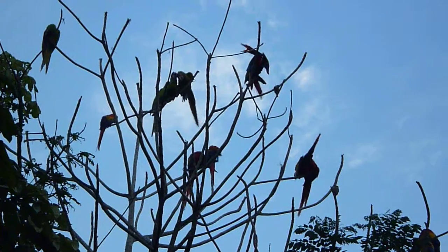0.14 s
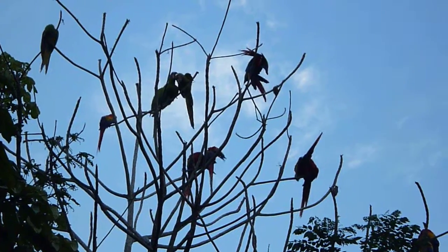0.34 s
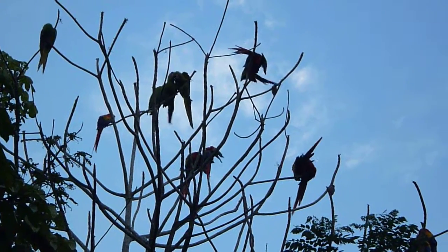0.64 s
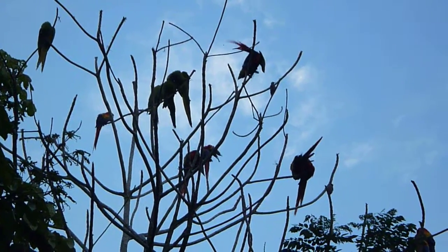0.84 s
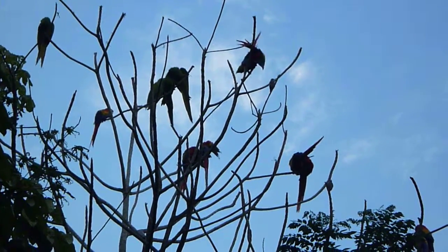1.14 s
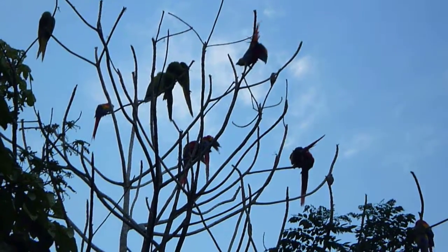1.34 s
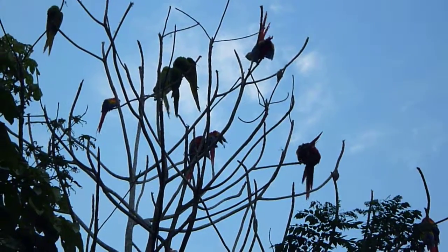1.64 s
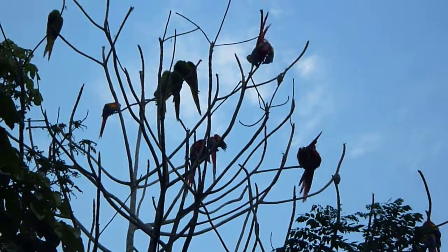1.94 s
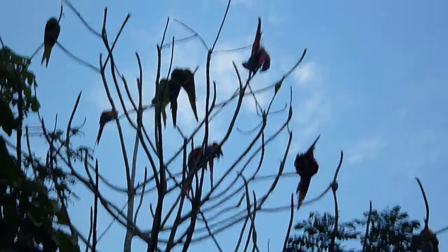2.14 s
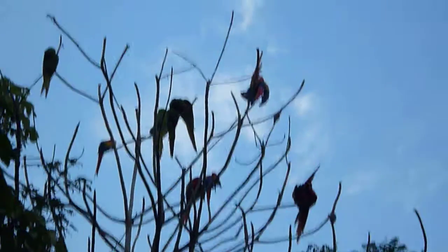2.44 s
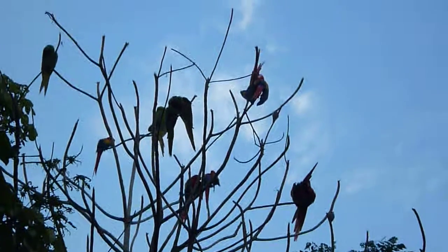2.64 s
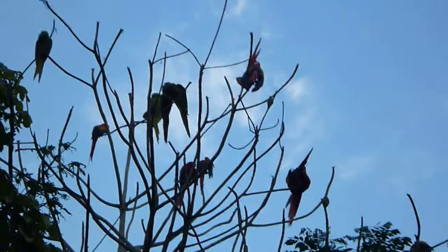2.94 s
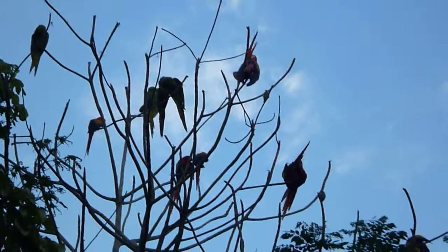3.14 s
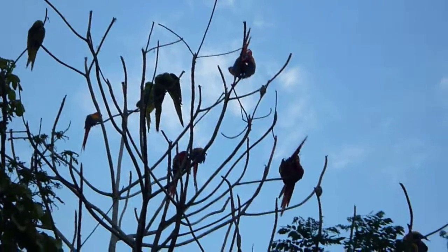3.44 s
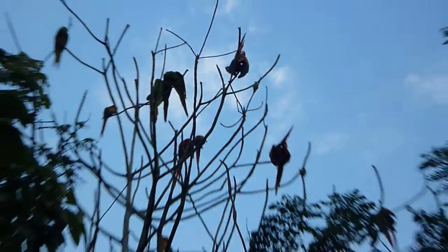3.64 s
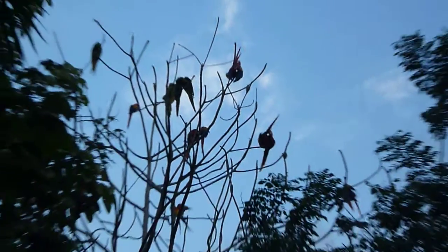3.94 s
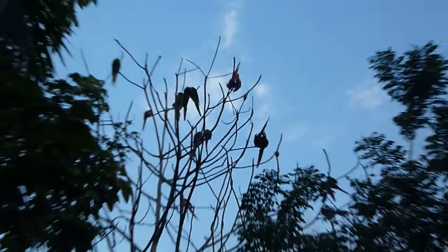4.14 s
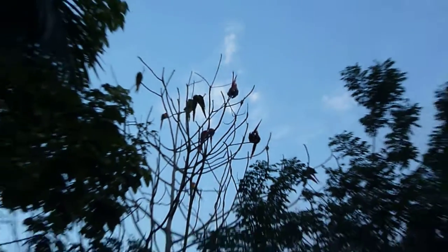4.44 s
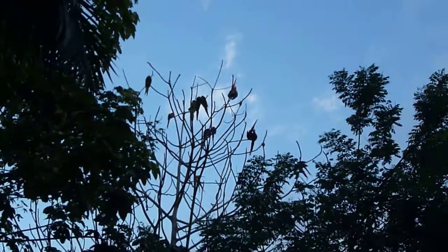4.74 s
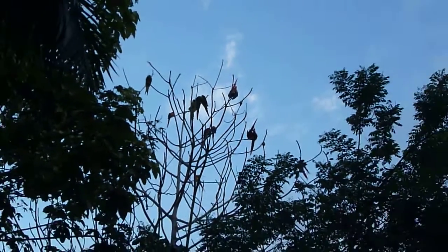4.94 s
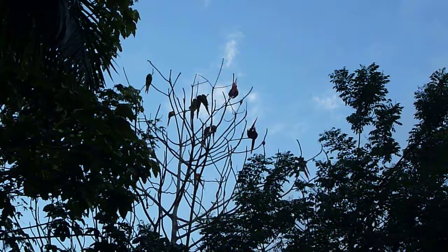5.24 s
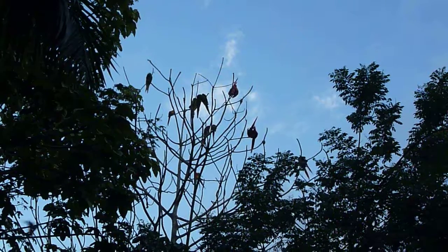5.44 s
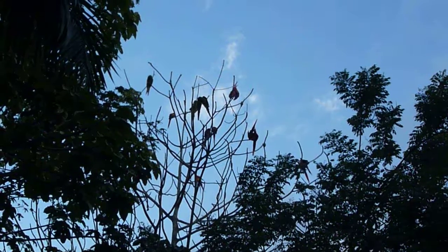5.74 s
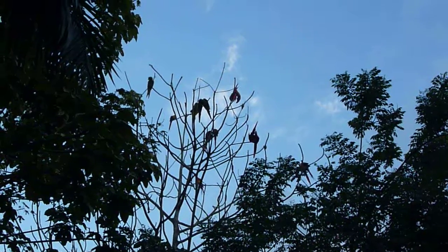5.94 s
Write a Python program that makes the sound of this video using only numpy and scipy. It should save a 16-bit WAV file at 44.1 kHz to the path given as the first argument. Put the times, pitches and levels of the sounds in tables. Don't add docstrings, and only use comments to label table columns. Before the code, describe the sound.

A six-second outdoor scene under trees, with mildly dull, hissy small-camera sound. A hoarse parrot squawk swells up at about 0.2 s, a stronger one follows at 0.75, and further raspy, wavering calls come until 2.9, overlapping most around 2.0-2.5. Two low peeps sit near 0.6, and one clear small-bird whistle arches and drops at 1.6-1.8. Close plastic ticks sound at 1.23 and 1.9, with a bump at 1.95. From 3 to 4 s the flock quiets; long faint whistles and small grating calls remain. A squawk returns at 4.0, a scuff and bump at 4.65, then rough squawks at 5.1, 5.3 and 5.65. A loud, dense clatter of clicks strikes at 5.68-5.8, before a last faint squawk and chirps. Soft forest air and a thin, throbbing insect ring persist throughout, with intermittent very faint low engine drones.

```python
import sys
import numpy as np
from scipy import signal
from scipy.fft import rfft, irfft
from scipy.io import wavfile

SR = 44100
rng = np.random.default_rng(int(sys.argv[2]) if len(sys.argv) > 2 else 0)


def volts(x):
    e = np.asarray(x, float) / 20
    return 10 ** e


def waveform_to_disk(signal):
    frames = np.transpose(np.atleast_2d(signal))
    scaled = np.clip(frames, -1, 1) * 32767
    samples = np.round(scaled).astype(np.int16)
    wavfile.write(sys.argv[1], SR, samples)


N = 268128

# start in seconds, attack in seconds, hold in seconds,
# release in seconds, level in dB.
SQUAWK_CALLS = [(.21, .2, .04, .2, -42.5), (.75, 0.29, 0.0033, 0.13, -38.5), (1.075, 0.063, 0.091, .1, -46),
                (1.499, .12, 0.067, 0.038, -49.5), (1.937, 0.013, 0.012, 0.15, -44),
                (2.065, 0.063, .22, .07, -40), (2.357, 0.02, .17, 0.13, -43.5), (2.7, 0.12, .03, 0.22, -53),
                (4.031, 0.15, 0.0091, 0.19, -47), (5.062, 0.13, 0.071, .2, -42.5),
                (5.32, .24, .07, 0.11, -38), (5.94, 0.14, 0.046, 0.046, -57.5),
                (2.059, 0.045, .15, 0.084, -45.5), (5.652, 0.019, 0.058, 0.19, -43.5),
                (4.72, 0.023, 0.029, .2, -53.5)]
# first pitch in Hz, last pitch in Hz,
# breath noise share from 0 to 1, throat shape number.
SQUAWK_VOICES = [(455, 470, .6, 0), (372, 335, .57, 1), (378, 340, .33, 2), (420, 420, .8, 3),
                 (498, 498, .4, 4), (472, 378, .36, 5), (565, 572, .6, 6), (450, 450, .8, 3),
                 (484, 470, .42, 7), (362, 352, .52, 8), (432, 425, .7, 9), (520, 536, .65, 4),
                 (502, 450, .3, 10), (435, 435, .7, 9), (450, 450, .8, 3)]
# frequency in Hz, density in dB per Hz.
THROAT_SHAPES = [
    [(900, -22), (1470, -1), (2100, -1), (2900, -2), (4470, -10)],
    [(900, -11.5), (1280, -7.5), (2190, -0.5), (2620, -6), (4400, -10)],
    [(1250, 5.5), (1480, -7.5), (1800, 4.5), (2300, -2.5), (4610, -8)],
    [(1000, -1), (1620, -2), (2400, -6.5), (3380, -6), (4600, -15.5)],
    [(1000, -19), (1470, 8.5), (2670, -3), (3340, -2.5), (4000, -6)],
    [(1190, -10), (1750, -7.5), (2380, 0.5), (2950, -6), (4200, -15.5)],
    [(1000, -15), (1680, -3.5), (1950, -7.5), (2990, -8), (4300, -16.5)],
    [(1090, -8), (1930, -1.5), (2910, -1), (3630, -14), (4370, -5.5)],
    [(1000, -7), (1470, -10.5), (1830, 1), (2050, -11), (2970, -8.5)],
    [(1000, -10), (1740, -1), (1950, -4), (2640, -4), (4270, -9)],
    [(1200, -14), (2300, -6), (2950, 5), (3500, -8), (4300, -7)],
]
# frequency in Hz, density in dB per Hz.
THROAT_SLOPES = [(530, -39.5), (5300, -21), (7000, -53.5)]


def squawks():
    sag_power = 4.0
    jitter_at_full_noise = 0.07
    beak_hz = 2500
    beak_lag, beak_steepness = 0.15, 0.96
    n = SR // 2
    out, t = np.zeros(N + n), np.arange(n) / SR
    for call, voice in zip(SQUAWK_CALLS, SQUAWK_VOICES):
        start_s, attack, hold, release, db = call
        first_hz, last_hz, noisy, throat = voice
        progress = np.minimum(t / (attack + hold + release), 1)
        pitch = first_hz + (last_hz - first_hz) * progress ** sag_power
        jitter = 1 + jitter_at_full_noise * noisy ** 2 * drift(95.3, n)
        phase = 2 * np.pi * np.cumsum(pitch * jitter) / SR

        tone = np.zeros(n)
        for k in range(2, 14):
            tone += volts(3.5 * drift(24, n)) * np.cos(k * phase + k * k * 0.3)
        breath = rng.standard_normal(n) * (1 + 0.47 * np.cos(phase))
        source = np.sqrt(1 - noisy) * rms_one(tone) + np.sqrt(noisy) * 1.9 * rms_one(breath)

        voiced, hz = colour(source, sorted(THROAT_SHAPES[throat] + THROAT_SLOPES))
        upper = 1 / (1 + (beak_hz / (hz + 1)) ** 8)
        parts = np.array([irfft(voiced * (1 - upper), n), irfft(voiced * upper, n)])
        chest, beak = rms_one(parts) / np.sqrt(2)

        stutter = rms_one(volts(2.0 * drift(130, n)))
        chest_gain = swell(t, attack, hold, release)
        beak_gain = swell(t - beak_lag * attack, attack, hold, release) ** beak_steepness
        start = round(start_s * SR)
        out[start:start + n] += stutter * volts(db) * (chest_gain * chest + beak_gain * beak)
    return out[:N]


def swell(t, attack, hold, release):
    depth_db, attack_curve, release_curve = 15.5, 1.58, 0.91
    before = np.clip(1 - t / attack, 0, 1)
    after = np.clip((t - attack - hold) / release, 0, 1)
    edge = np.clip(np.minimum(t, attack + hold + release - t) / 0.0087, 0, 1)
    return edge * volts(-depth_db * (before ** attack_curve + after ** release_curve))


# time in seconds, pitch in Hz, level in dB.
CLEAR_WHISTLE = [
    (1.562, 2020, -54),
    (1.58, 2050, -43),
    (1.635, 2100, -40),
    (1.685, 2060, -39),
    (1.72, 1960, -37),
    (1.742, 1790, -33),
    (1.758, 1610, -37),
    (1.778, 1440, -48),
]


def near_whistle():
    return whistles([CLEAR_WHISTLE], waver_hz=3.7, flutter_db=1.5)


# start in seconds, length in seconds, first pitch in Hz,
# last pitch in Hz, level in dB.
LONG_WHISTLES = [
    (1.24, .29, 2620, 3260, -60.5),
    (3.45, .36, 2860, 2840, -61),
    (3.58, .26, 2250, 2550, -65),
    (3.84, .3, 2850, 2850, -65),
    (4.1, .06, 1500, 1900, -54),
    (4.28, .3, 2860, 2830, -63),
    (5.03, .3, 2620, 3150, -57),
    (6.02, .05, 3400, 3600, -64),
]
# start in seconds, length in seconds, first pitch in Hz,
# last pitch in Hz, level in dB.
THIN_NOTES = [
    (.553, 0.043, 815, 820, -53),
    (.648, 0.083, 835, 815, -54.5),
    (1.986, 0.052, 3400, 3250, -57),
    (4.15, .05, 4390, 4280, -55.5),
    (3.02, .2, 2220, 2083, -61.5),
    (3.999, 0.13, 1500, 1500, -58.5),
    (4.175, 0.053, 1950, 1350, -54.5),
    (4.8, 0.12, 2130, 2200, -57.5),
    (5.99, 0.091, 2090, 2150, -55.5),
]


def far_whistles():
    long_notes = whistles(map(arch, LONG_WHISTLES), waver_hz=25, flutter_db=3)
    thin_notes = whistles(map(arch, THIN_NOTES), waver_hz=35, flutter_db=3.5)
    return long_notes + thin_notes


def whistles(tables, waver_hz, flutter_db):
    out = np.zeros(N)
    for rows in tables:
        start, edge, (hz, db) = span(rows, fade_s=0.0079)
        n = len(edge)
        phase = 2 * np.pi * np.cumsum(hz + waver_hz * drift(51, SR // 2)[:n]) / SR
        tone = np.sin(phase) + volts(-30) * np.sin(3 * phase)
        level = volts(db + flutter_db * drift(33, SR // 2)[:n])
        out[start:start + n] += edge * np.sqrt(2) * level * tone
    return out


# start in seconds, length in seconds, first pitch in Hz,
# last pitch in Hz, level in dB.
GRATING_NOTES = [
    (3.44, .06, 2900, 2830, -52.5),
    (2.8, .2, 1250, 1500, -57.5),
    (2, 0.14, 3450, 3600, -54),
    (4.725, .09, 2750, 2960, -47),
    (3.035, .14, 3350, 2600, -54.5),
]


def grating_birds():
    return rasps(GRATING_NOTES, pulse_hz=220)


def forest(x):
    t60_s, tail_db, gap_s = 0.36, -17, 0.03
    t = np.arange(SR // 2) / SR
    tail = band(rng.standard_normal(len(t)), 240, 4000, order=1)
    tail = tail * volts(-60 * t / t60_s) * (t > gap_s)
    return x + volts(tail_db) * signal.fftconvolve(x, tail / np.sqrt(np.sum(tail ** 2)))[:N]


# time in seconds, level in dB,
# top band relative to the tick in dB, low band relative to the tick in dB.
BODY_TICKS = [(1.2312, -27, 1, -14), (1.8941, -35, -9, -6), (1.9026, -22, -4, -11), (1.9085, -29, -6, -18),
              (1.9201, -32, -9, -7), (2.8271, -39, -10, -6), (3.2416, -39, -8, -8), (3.4795, -42, -7, -3),
              (4.5842, -39, -9, -6), (5.6839, -13, 3, -13), (5.6961, -9, -4, -15), (5.699, -9, -1, -11),
              (5.7184, -18, 0, -9), (5.7204, -15, -8, -15), (5.7237, -17, -2, -9), (5.7302, -28, -8, -11),
              (5.7368, -22, -7, -15), (5.7455, -15, -7, -13), (5.7535, -12, -5, -14), (5.758, -31, -1, -2),
              (5.7632, -11, -6, -13), (5.7687, -16, -4, -14), (5.7751, -25, -8, -8), (5.7904, -24, -7, -9)]


def ticks():
    out, t = np.zeros(N), np.arange(400) / SR
    for s, db, top_db, low_db in BODY_TICKS:
        hit = rng.standard_normal(400) * (np.exp(-t / 0.0005) + 0.12 * np.exp(-t / 0.003))
        hit[0] = -4
        mid, top, low = band(hit, 2840, 5930), band(hit, 4970, 7970), band(hit, 366, 2200)
        click = peak_one(mid) + volts(top_db + 1.0) * peak_one(top)
        thud = volts(low_db - 1.0) * peak_one(low)
        i = round(s * SR)
        out[i:i + 400] += volts(db + 4.5) * (peak_one(click) + thud)
    return out


# start in seconds, length in seconds, level in dB, centre in Hz.
RUBS = [(1.196, 0.0054, -43.5, 6100), (1.236, 0.061, -51.5, 5630), (1.872, 0.067, -49, 4760),
        (2.504, 0.068, -51.5, 4430), (2.617, 0.0052, -46.5, 4800), (2.819, 0.013, -52, 3930),
        (3.01, 0.051, -60.5, 4660), (4.39, 0.065, -54, 4200), (4.506, 0.027, -57, 4480),
        (4.577, 0.0059, -50, 4670), (4.649, 0.0031, -29, 4430), (4.66, 0.014, -30.5, 4100),
        (4.681, 0.0044, -38.5, 4060), (5.15, 0.025, -65, 6500), (5.245, 0.025, -51.5, 6200)]


def scuffs():
    out = np.zeros(N)
    for s, length, db, hz in RUBS:
        n, i = round(length * SR), round(s * SR)
        grit = volts(3.9 * drift(300, 3000)[:n])
        grains = rng.standard_normal(3000)[:n] * np.sqrt(np.hanning(n)) * grit
        out[i:i + n] += volts(db) * rms_one(band(grains, 0.64 * hz, 1.324 * hz))
    return out


# time in seconds, height in dB, half width in seconds, direction as a sign.
HOUSING_BUMPS = [
    (1.9528, -20, 0.00047, 1),
    (2.0, -33, 0.00039, 1),
    (3.4489, -35, 0.00043, 1),
    (4.6471, -23, 0.00022, 1),
    (4.6487, -23.5, 0.00066, -1),
    (4.6666, -26, 0.00044, -1),
    (5.698, -29.5, 0.00042, 1),
]


def bumps():
    out, t = np.zeros(N), np.arange(-600, 600) / SR
    for s, db, width, way in HOUSING_BUMPS:
        i = round(s * SR)
        swing_back = 0.21 * np.exp(-((t - width) / (4.7 * width)) ** 2)
        push = np.exp(-(t / width) ** 2) - swing_back
        out[i - 600:i + 600] += np.sign(way) * volts(db) * push
    return out


# frequency in Hz, width in Hz, level in dB.
WING_MODES = [
    (5943, 200, 0.5),
    (6300, 130, -4.5),
]


def insects():
    level_db, throb_s, dip_at_s, throb_db = -61, 0.491, 2.388, 2
    dip = np.cos(np.pi * (np.arange(N) / SR - dip_at_s) / throb_s) ** 2
    out = np.zeros(N)
    for hz, width, mode_db in WING_MODES:
        clicks = rng.standard_normal(N) * (rng.random(N) < 1500 / SR)
        ring = resonance(resonance(clicks, hz, 1.5 * width), hz, 1.5 * width)
        out += volts(mode_db + 1.4 * drift(5.3, N)) * rms_one(ring)
    return volts(level_db - throb_db * dip) * rms_one(out)


# start in seconds, length in seconds, first pitch in Hz, last pitch in Hz, level in
# dB.
LOW_HUMS = [
    (0, 0.63, 61.6, 60.3, -68.5),
    (1.1, 0.85, 63.5, 63, -70.5),
    (1.95, 1.4, 96.6, 93.6, -63),
    (3.95, 1, 94.3, 96.6, -63.5),
]


def drones():
    return rasps(LOW_HUMS, pulse_hz=14.0)


# frequency in Hz, density in dB per Hz.
AIR_COLOUR = [(25, -29), (60, -4.5), (100, -4), (250, -3), (450, -2), (800, -4), (1300, -4.5), (1900, -8),
              (2800, -7.5), (3700, -12.5), (5000, -15.5), (7000, -19), (9000, -18)]


def air():
    lull_s, lull_width_s, lull_db, flock_hz = 3.57, 1, 2, 1600
    lull = np.exp(-((np.arange(N) / SR - lull_s) / lull_width_s) ** 2)
    edges = 24 * 2 ** np.arange(0, 8.8, 1 / 3)
    white, shared = rng.standard_normal((2, N)), drift(0.5, N)
    flicker = [drift(7.4, N) for _ in range(5)]
    point_hz, point_db = np.transpose(AIR_COLOUR)
    out = np.zeros(N)
    for k, (low, high) in enumerate(zip(edges, edges[1:])):
        db = np.interp(np.log(low * high) / 2, np.log(point_hz), point_db)
        db = db - lull_db * lull * np.exp(-np.log(low / flock_hz) ** 2)
        out += volts(db + 0.68 * shared + 1.52 * flicker[k % 5]) * band(white[k % 2], low, high)
    return volts(-51.5) * rms_one(out)


def rasps(notes, pulse_hz):
    out = np.zeros(N)
    for note in notes:
        start, edge, (hz, db) = span(arch(note), fade_s=0.0093)
        n = len(edge)
        carrier = np.sin(2 * np.pi * np.cumsum(hz) / SR)
        out[start:start + n] += edge * volts(db) * drift(pulse_hz, 2 * SR)[:n] * carrier
    return out


def arch(note):
    s, length, first_hz, last_hz, db = note
    u = np.linspace(0, 1, 9)
    level_db = db + 20 * 0.6 * np.log10(np.sin(np.pi * u) + 0.22)
    return np.transpose([s + length * u, first_hz + (last_hz - first_hz) * u, level_db])


def span(rows, fade_s):
    s, *columns = np.transpose(rows)
    start = max(round(s[0] * SR), 0)
    t = np.arange(start, min(round(s[-1] * SR), N)) / SR
    edge = np.clip(np.minimum(t - s[0], s[-1] - t) / fade_s, 0, 1)
    return start, edge, [np.interp(t, s, c) for c in columns]


def drift(rate, size):
    r = np.exp(-16 * np.pi * rate / SR)
    noise = rng.standard_normal(size // 8 + 1002)
    slow = signal.lfilter([1], [1, -2 * r, r * r], noise)[1000:]
    return np.interp(np.arange(size) / 8, np.arange(len(slow)), rms_one(slow))


def resonance(x, hz, width_hz):
    r = np.exp(-np.pi * width_hz / SR)
    zeros = np.array([1, 0, -1]) * (1 - r * r) / 2
    return signal.lfilter(zeros, [1, -2 * r * np.cos(2 * np.pi * hz / SR), r * r], x)


def band(x, low_hz, high_hz, order=2):
    return signal.sosfilt(signal.butter(order, [low_hz, high_hz], "band", fs=SR, output="sos"), x)


def colour(x, points):
    hz, points = np.fft.rfftfreq(len(x), 1 / SR), np.array(points)
    gain_db = np.interp(np.log(hz + 1), np.log(points[:, 0]), points[:, 1])
    return rfft(x) * volts(gain_db), hz


def rms_one(x):
    return x / np.sqrt(np.mean(x ** 2) + 1e-20)


def peak_one(x):
    return x / np.abs(x).max()


def scene():
    birds = forest(squawks() + near_whistle() + far_whistles() + grating_birds())
    handling = ticks() + scuffs() + bumps()
    background = insects() + drones() + air()
    return (birds + handling + background)[None]


def low_pass(x):
    return signal.sosfilt(signal.butter(12, 8880, fs=SR, output="sos"), x)


# frequency in Hz, gain in dB.
SAMPLING_RESPONSE = [(20, 0.5), (6900, -1.5), (7400, -9.5), (7700, -20), (7950, -47), (8050, -43),
                     (8450, -27.5), (8750, -27), (9050, -47.5), (12000, -80), (22050, -90)]
# from in seconds, to in seconds, low edge in Hz, high edge in Hz.
THINNED_BAND = (3.5, 4.6, 232, 290)


def record(dry):
    notch_hz, notch_width_hz = 5425, 170
    spectrum, hz = colour(dry[0], SAMPLING_RESPONSE)
    off = hz - notch_hz
    spectrum = spectrum * 1j * off / (notch_width_hz + 1j * off)

    t0, t1, low, high = THINNED_BAND
    share = np.interp(np.arange(N) / SR, [t0 - 0.02, t0, t1, t1 + 0.02], [0, 0.68, 0.72, 0])
    low_band = irfft(spectrum * (hz > low) * (hz < high), N)
    mix = irfft(spectrum, N) - share * low_band
    return low_pass(mix[None])


dry = scene()
out = record(dry)
waveform_to_disk(out)
```